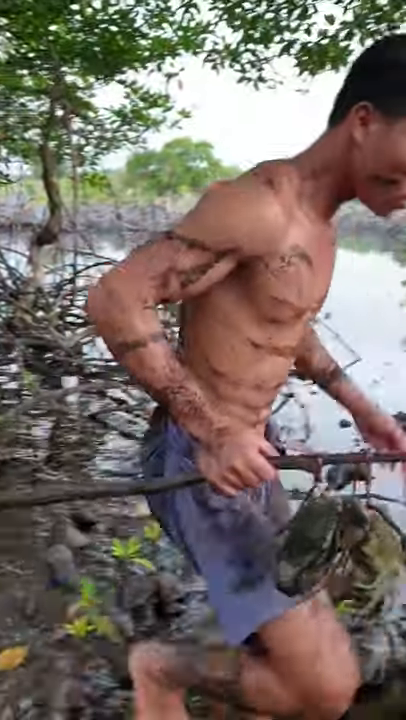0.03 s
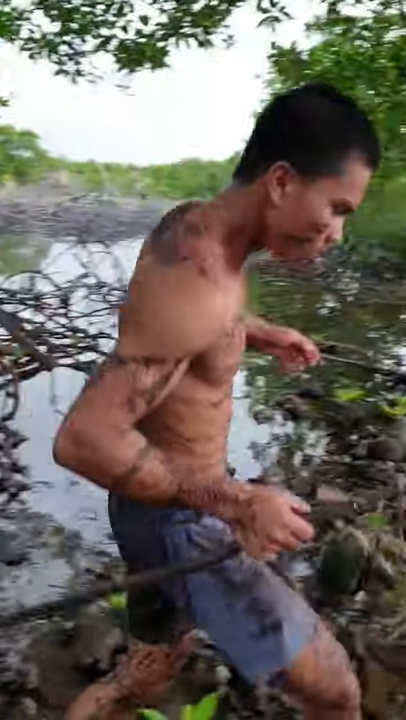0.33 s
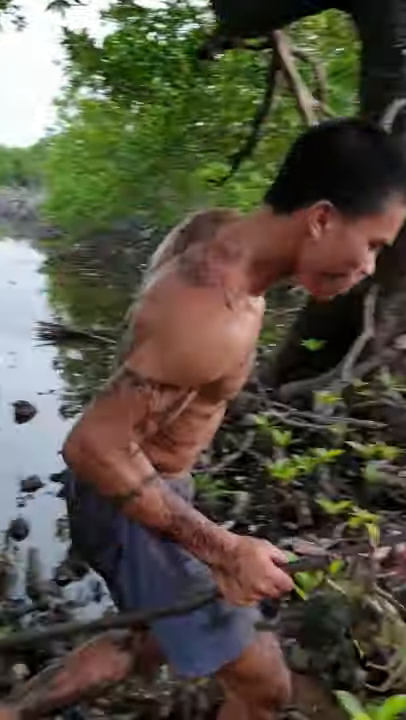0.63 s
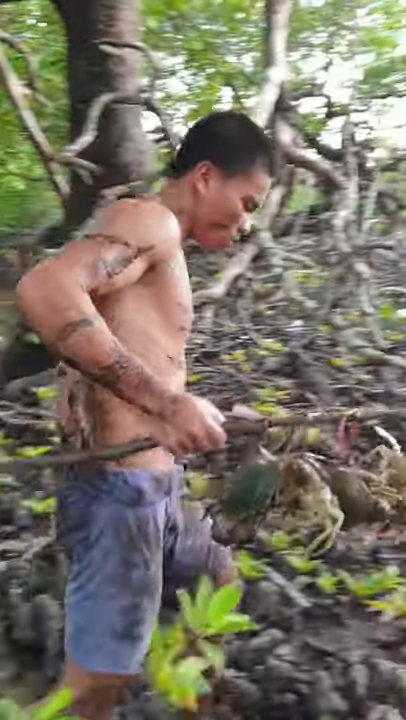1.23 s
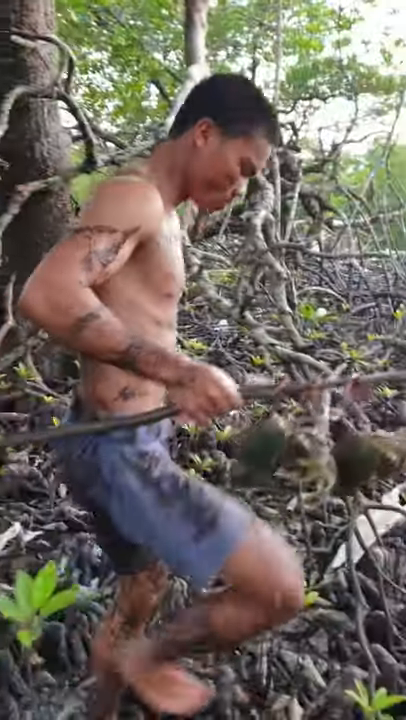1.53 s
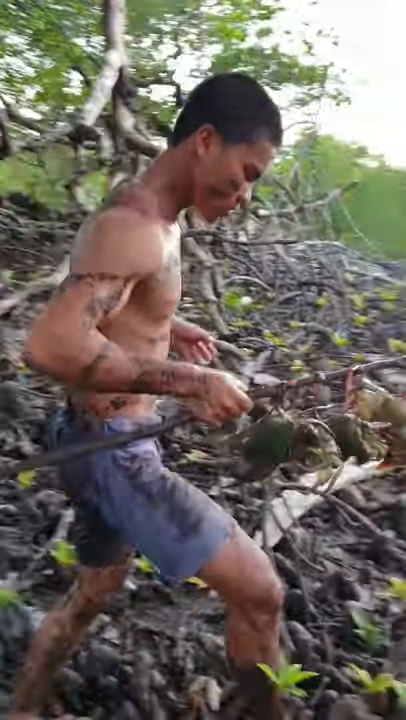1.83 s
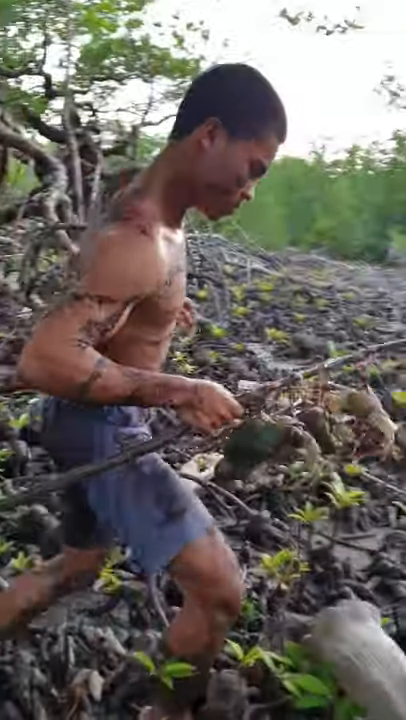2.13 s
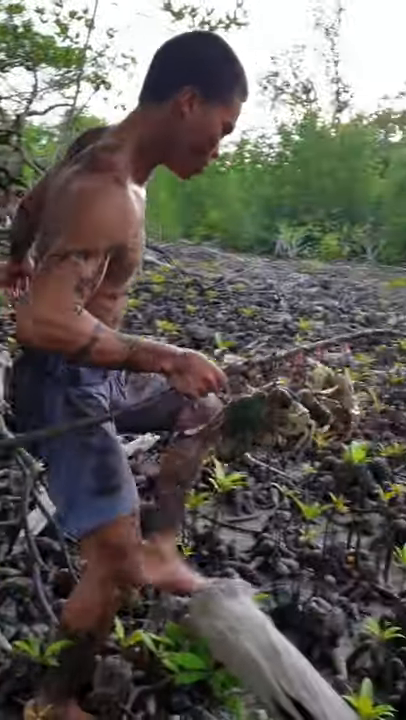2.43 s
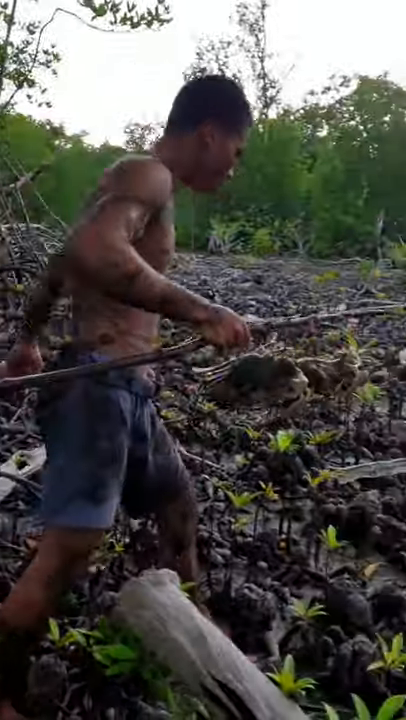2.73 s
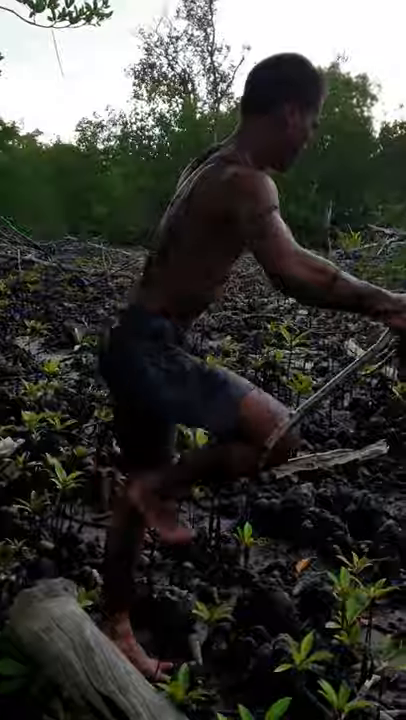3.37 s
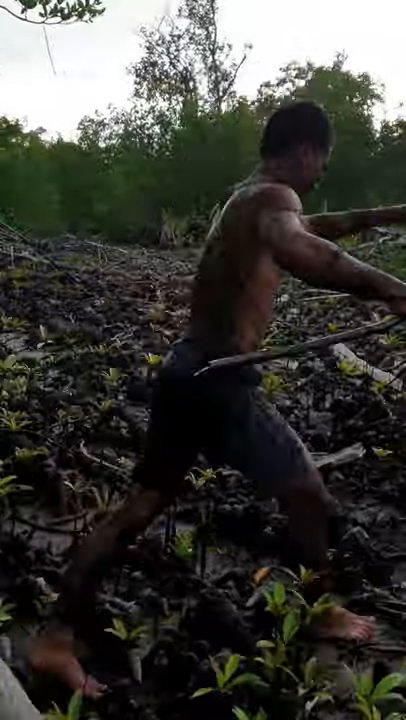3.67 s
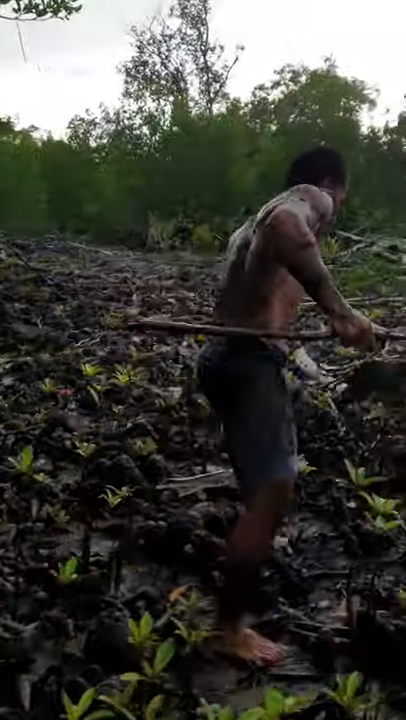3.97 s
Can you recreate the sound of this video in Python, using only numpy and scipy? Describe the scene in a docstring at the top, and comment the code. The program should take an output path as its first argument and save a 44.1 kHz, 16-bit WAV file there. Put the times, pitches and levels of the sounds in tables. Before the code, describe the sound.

Wet footsteps squelch close by as someone strides barefoot over a muddy mangrove flat. The mud gurgles and crackles, bubbles pop and twigs snap, with a few soft thuds later. Low air rumble and handling clicks touch the microphone.

```python
"""Muddy mangrove flat: someone strides barefoot, close by.
Each step presses water and air out of the mud: low gurgles, crackling bubbles, fine wet spray.
Larger bubbles pop, twigs and shoots snap, feet thud; the thicket adds a short echo.
Handling clicks and rumbling air sit mostly on the left microphone; a soft low rustle starts near 2.5 s.
Behind: wet ground fizzes, three thin chirps sound far off."""
import sys
import numpy as np
from scipy import signal
from scipy.fft import rfft, irfft
from scipy.io import wavfile
from scipy.ndimage import uniform_filter1d

SR = 44100
rng = np.random.default_rng(int(sys.argv[2]) if len(sys.argv) > 2 else 0)


def put_to_file(sound):
    """Save the sound as 16-bit audio at rate SR, in the file named by the first command-line argument."""
    columns = np.atleast_2d(sound).T  # one column per channel
    safe = np.clip(columns, -1, 1)
    whole_steps = np.round(safe * 32767)
    wavfile.write(sys.argv[1], SR, whole_steps.astype(np.int16))


N = 176400

# Moving air: t/s, level/dB (all table levels are relative)
AIR_LEVEL = [(0, -47.5), (.6, -48), (.85, -50), (1.3, -48), (1.55, -49.5), (1.85, -41.5), (2.2, -50.5),
             (2.7, -47.5), (3, -53.5), (3.7, -48)]
# Air spectrum: f/Hz, gain/dB
AIR_SPECTRUM = [(20, -26), (36, -19), (52, -2.5), (75, -0.5), (110, -3.5), (230, -21.5), (400, -35),
                (2000, -83)]
# Seeping ground and leaves: t/s, level/dB
SEEP_LEVEL = [(0, -49), (1.1, -48.5), (1.7, -49.5), (2.2, -51), (2.72, -55), (4, -53)]
# Seep spectrum: f/Hz, gain/dB
SEEP_SPECTRUM = [(400, -1.5), (1800, -3), (4500, -4), (8000, 0)]
# Distant chirps: t/s
CHIRP_TIMES_S = [2.44, 2.51, 2.58]
# Thicket echo: f/Hz, T60/s
THICKET_T60 = [(200, 0.17), (8000, 0.17)]
# Body weight landing: t/s, level/dB, f/Hz
FOOT_THUDS = [(2.10, -39, 103), (3.046, -41, 148), (3.278, -38, 61)]
# Knocks: handling clicks and bumps, mostly on the left, plus the low, longer body of footfalls near 2.1 s and
# 3.04-3.13 s: t/s, level/dB, cutoff/Hz, decay/s, left minus right/dB
KNOCKS = [(0.444, -43, 780, 0.0013, 17), (.672, -32, 600, 0.0015, 17),
          (2.1042, -25.5, 3500, 0.00047, 7.5), (2.108, -46, 1150, 0.03, 11),
          (2.655, -33.5, 2460, 0.00078, 18.5), (3.043, -44, 287, 0.036, 6.5),
          (3.053, -41, 2640, 0.0027, 17), (3.07, -37.5, 3330, 0.0032, 10.5),
          (3.083, -39.5, 2740, 0.0071, 8), (3.1246, -31, 2660, 0.0062, 8),
          (3.127, -43.5, 403, 0.04, 2)]
# Twigs and shoots: t/s, level/dB, f/Hz, width/oct, decay/s, echo/dB
TWIG_SNAPS = [(.287, -37, 9500, 0.91, 0.0025, -4), (1.1818, -11, 9830, 0.08, 0.0013, -5),
              (1.178, -28, 13500, .25, .008, 0), (1.450, -25, 7340, 0.76, 0.0014, -8),
              (1.519, -32, 7000, 0.15, 0.0027, -1), (1.628, -30, 6900, 0.15, 0.0038, -11),
              (1.80, -30, 12500, 0.27, 0.0018, 5), (1.951, -22.5, 6060, 0.55, 0.0014, -0.5),
              (2.049, -28.5, 7050, 2, 0.0031, 2.5), (2.226, -34, 9900, 1.5, 0.0023, -7),
              (3.37, -37.5, 9900, 0.38, 0.0041, -5), (2.4316, -28.5, 6830, .07, 0.003, 2),
              (3.548, -25, 11000, 0.52, 0.0021, -4), (3.566, -33.5, 2430, 0.3, 0.0018, -13),
              (3.876, -37.5, 12600, 0.34, 0.022, 5.5)]
# Larger bubbles: t/s, level/dB, f/Hz, decay/s, left minus right/dB
BUBBLE_POPS = [(.102, -28, 4050, 0.0021, -8.5), (.123, -27.5, 3240, 0.00084, -11),
               (.467, -31.5, 5400, 0.0014, -4), (.486, -24, 5340, .001, 6.5),
               (0.6671, -23.5, 1153, 0.0023, 5.5), (0.742, -31, 2770, 0.0019, -5),
               (.751, -25.5, 3320, .0007, 0), (.839, -26, 6940, 0.0014, 4), (0.968, -33, 3250, 0.0034, 0.5),
               (1.029, -20.5, 3340, 0.00083, -6.5), (1.144, -26.5, 1740, 0.0016, 3),
               (1.205, -35.5, 1300, 0.0021, 5), (1.382, -23, 2320, 0.00072, 4),
               (1.422, -29.5, 906, 0.0024, 7), (1.449, -30, 2550, 0.00067, 2),
               (1.5866, -26.5, 2170, 0.0029, 0.5), (1.629, -29.5, 2580, 0.0022, 1),
               (1.711, -33.5, 2180, 0.0016, 0), (1.800, -36.5, 3470, .002, -8),
               (1.906, -34.5, 1920, 0.0029, 4.5), (1.950, -27, 2600, 0.00055, 1),
               (3.1268, -34.5, 600, 0.0046, 4)]
# Mud presses, plus one soft low rustle from about 2.5 s:
# t/s, rise/s, 20 dB fall/s (sign unused), gurgle/dB, crackle/dB, crackle f/Hz, spray/dB
PRESSES_AND_RUSTLE = [(-.05, 0.042, 0.15, -48, -53.5, 2980, -46.5),
                      (.025, 0.091, 0.17, -44, -41, 3250, -40.5), (.456, .016, 0.23, -79, -39.5, 4400, -45),
                      (0.499, 0.019, 0.3, -51.5, -50, 2370, -56.5),
                      (.622, .045, 0.1, -43.5, -42.5, 1310, -40),
                      (.70, 0.038, 0.2, -45.5, -42, 2620, -39.5), (.77, 0.02, 0.13, -61, -46, 750, -60),
                      (.88, 0.056, 0.2, -59.5, -42.5, 3020, -45),
                      (1.15, 0.035, 0.12, -55, -48.5, 2300, -37),
                      (1.272, 0.052, 0.08, -50.5, -68, 2720, -45.5),
                      (1.29, 0.11, .18, -44.5, -41.5, 3200, -34.5), (1.48, 0.044, .07, -49, -46, 2630, -49),
                      (1.55, 0.064, 0.14, -81, -44.5, 2510, -40), (1.689, 0.021, 0.1, -69, -48, 4000, -47),
                      (1.792, 0.016, 0.24, -70, -49, 3300, -44.5),
                      (1.88, 0.086, 0.15, -68, -45.5, 2140, -45.5),
                      (2.043, 0.01, .15, -67, -52.5, 2780, -39.5),
                      (2.10, 0.013, -0.03, -56, -44, 1000, -73),
                      (2.179, .13, 0.15, -68, -54.5, 2540, -50.5), (2.45, .15, 0.5, -72, -62, 420, -61),
                      (2.839, 0.048, 0.27, -61, -60.5, 2205, -55),
                      (3.04, 0.047, -0.18, -56, -49.5, 677, -50.5),
                      (3.117, 0.012, 0.13, -48, -47, 924, -43.5),
                      (3.231, 0.062, 0.15, -62.5, -53, 440, -57.5),
                      (3.372, 0.057, -0.4, -68.5, -70, 5700, -54.5),
                      (3.539, 0.011, 0.07, -69, -51, 2300, -44), (3.569, .025, 0.05, -73, -57, 4900, -42),
                      (3.70, .045, 0.12, -55, -49, 4500, -41.5), (3.85, 0.036, 0.16, -57, -54.5, 2250, -47),
                      (3.92, 0.061, -1.5, -59.5, -62, 3940, -48)]
# Gurgle spectrum: f/Hz, gain/dB
GURGLE_SPECTRUM = [(100, -22), (400, -11), (620, -2), (1100, 2.5), (2000, -0.5), (4000, -22)]
# Spray spectrum: f/Hz, gain/dB
SPRAY_SPECTRUM = [(500, -10), (2500, 1.5), (4500, 0), (12000, 0), (15000, -5)]
# Left microphone, muffled: f/Hz, gain/dB
LEFT_RESPONSE = [(60, -1.5), (3400, -1.5), (4300, -4.5), (5000, -18.5), (6400, -23), (7500, -46),
                 (8300, -25), (9500, -14.5), (11000, -13.5), (12500, -21.5), (15000, -25)]
# Right microphone, thin: f/Hz, gain/dB
RIGHT_RESPONSE = [(60, -24), (180, -24.5), (270, -7.5), (400, -4), (800, -3), (1600, -3.5), (3000, 0),
                  (5200, 0.5), (7000, 3.5), (8500, -2.5), (10200, -2.5), (12000, 3.5), (14500, -5)]


def amp(db):
    """dB to gain."""
    return 10 ** (np.asarray(db) / 20)


def unit_rms(x):
    """Scale to rms 1."""
    return x / np.sqrt(np.mean(x ** 2) + 1e-20)


def at_hz(table, hz):
    """Table lookup over log frequency."""
    f, value = np.transpose(table)
    return np.interp(np.log(hz + 1), np.log(f), value)


def envelope(table):
    """Level curve to gain per sample."""
    return amp(np.interp(np.arange(N) / SR, *np.transpose(table)))


def add(mix, start_s, sound):
    """Mix in a stereo sound."""
    part = mix[:, max(round(start_s * SR), 0):][:, :sound.shape[1]]
    part += sound[:, :part.shape[1]]


def panned(sound, pan_db, lag_s=.00022, centre_db=6):
    """Pan by level and delay; at centre_db both sides arrive together."""
    lag = round(lag_s * SR * np.clip(1 - pan_db / centre_db, -1, 1.2))
    left, right = max(lag, 0), max(-lag, 0)
    return np.array([np.pad(sound, (left, right)) * amp(pan_db / 2),
                     np.pad(sound, (right, left)) * amp(-pan_db / 2)])


def min_phase(shape_db, size=4096):
    """Minimum-phase impulse response of a gain curve."""
    hz = abs(np.fft.fftfreq(size, 1 / SR))
    log_gain = np.log(amp(np.maximum(shape_db(hz), -100)))
    return np.fft.ifft(np.exp(np.conj(signal.hilbert(log_gain)))).real[:size // 2]


def filtered(x, spectrum):
    """Apply a spectrum table."""
    response = min_phase(lambda hz: at_hz(spectrum, hz))
    return signal.oaconvolve(np.atleast_2d(x), response[None], axes=1)[:, :N]


def resonance(hz, width_oct):
    """One peak, as dB against frequency."""
    return lambda f: -20 * np.log10(1 + (np.log2((f + 1) / hz) / width_oct) ** 2 / 2)


def click(shape_db, decay_s, size=6000):
    """Filtered impulse with a splintering noise tail."""
    t = np.arange(size) / SR
    drive = rng.standard_normal(size) * np.exp(-t / decay_s) + 4 * (t == 0)
    sound = signal.fftconvolve(drive, min_phase(shape_db))[:size]
    return sound * np.sqrt(decay_s * SR / 4 / np.sum(sound ** 2))


def bubbles(low_hz, high_hz, cycles, spread_db, glide, hiss, count, size, lag_s=.00022, length=N):
    """Tiny rising rings of random pitch, strength and place, over hiss; level held steady."""
    when, pitch, strength, ring, side, lag = rng.random((count, 6)).T[:, :, None]
    n = np.arange(size)
    hz = low_hz * (high_hz / low_hz) ** pitch
    life_cycles = cycles * 2 ** (2 * ring - 1)
    age = hz * n / SR / life_cycles
    turns = life_cycles * age * (1 + glide * np.minimum(age, 2))
    rings = np.exp(-age) * (1 - np.exp(-2 * age * life_cycles)) * np.sin(2 * np.pi * turns)
    level_db = spread_db * np.minimum(-np.log(strength + 1e-9), 4)
    rings *= amp(level_db) * np.sqrt(hz / life_cycles) * (1 - n / size)
    out = np.zeros((2, length))
    for channel, sign in enumerate((-1, 1)):
        onset = (when * length - sign * lag * lag_s * SR).astype(int)
        pan = amp(sign * 10.1 * (side - .5))
        out[channel] = np.bincount(((onset + n) % length).ravel(), (rings * pan).ravel(), length)
    out = unit_rms(out) + hiss * rng.standard_normal((2, length))
    return out / np.sqrt(uniform_filter1d((out ** 2).mean(0), size=2400) + 1e-9)


def spits(rate_hz=24, decay_s=.008, depth=1.2):
    """Gain of a fizz that comes in sudden, short spits."""
    kicks = (rng.random(N) < rate_hz / SR) * np.minimum(rng.exponential(1, N), 2)
    return unit_rms(1 + depth * signal.lfilter([1], [1, -np.exp(-1 / (decay_s * SR))], kicks))


def air(correlation=.89):
    """Moving air: low rumble, alike on both sides."""
    left, other = rng.standard_normal((2, N))
    right = correlation * left + np.sqrt(1 - correlation ** 2) * other
    gain = amp(at_hz(AIR_SPECTRUM, np.fft.rfftfreq(N, 1 / SR)))
    return envelope(AIR_LEVEL) * unit_rms(irfft(rfft([left, right]) * gain, N))


def seep():
    """Wet ground: faint fizz of fine bubbles."""
    fizz = bubbles(4000, 14400, cycles=1, spread_db=6, glide=.011, hiss=1.96, count=6000, size=70)
    return envelope(SEEP_LEVEL) * unit_rms(filtered(fizz * spits(), SEEP_SPECTRUM))


def chirps(top_hz=13900, length_s=.055, level_db=-53, bend=.07):
    """Far whistles, arching up and down in pitch."""
    out, t = np.zeros((2, N)), np.arange(0, length_s, 1 / SR)
    arch = np.sin(np.pi * t / length_s)
    hz = top_hz * (1 - bend * (1 - arch))
    whistle = amp(level_db) * arch * np.sin(2 * np.pi * np.cumsum(hz) / SR)
    for start_s in CHIRP_TIMES_S:
        add(out, start_s, np.tile(whistle, (2, 1)))
    return out


def thicket(x, gap_s=.004, density=.15, size=20000):
    """Roots and trunks scatter a short, diffuse echo."""
    taps = rng.standard_normal((2, size)) * (rng.random((2, size)) < density)
    taps *= np.arange(size) / SR > gap_s
    hz, t, bands = signal.stft(taps, SR, nperseg=256)
    decay = amp(-60 * t / at_hz(THICKET_T60, hz)[:, None])
    tail = signal.istft(bands * decay, SR, nperseg=256)[1]
    return signal.fftconvolve(x, tail / np.linalg.norm(tail, axis=1, keepdims=True), axes=1)[:, :N]


def knocking(low_cut_hz=150):
    """Knocks: blunt handling clicks and bumps, mostly on the left microphone, and the low, dull body of some
    footfalls."""
    out = np.zeros((2, N))
    for start_s, db, cutoff_hz, decay_s, pan_db in KNOCKS:
        def band_db(f):
            return -10 * np.log10((1 + (f / cutoff_hz) ** 6) * (1 + (low_cut_hz / (f + 1)) ** 2))
        add(out, start_s, panned(amp(db) * click(band_db, decay_s), pan_db))
    return out


def thuds(rise_s=.011):
    """Soft ground gives a few low cycles under a landing foot."""
    out, t = np.zeros((2, N)), np.arange(SR // 5) / SR
    pulse = t / rise_s * np.exp(1 - t / rise_s)
    for start_s, db, hz in FOOT_THUDS:
        add(out, start_s, panned(amp(db) * pulse * np.sin(2 * np.pi * hz * t), pan_db=1.5))
    return out


def snaps():
    """Twigs and shoots break: bright resonant cracks, each with its own echo share."""
    direct, send = np.zeros((2, N)), np.zeros((2, N))
    for start_s, db, hz, width_oct, decay_s, echo_db in TWIG_SNAPS:
        crack = panned(amp(db) * click(resonance(hz, width_oct), decay_s), pan_db=0)
        add(direct, start_s, crack)
        add(send, start_s, crack * amp(echo_db))
    return direct + thicket(send)


def pops(glide=.058, attack_s=.00024):
    """Larger bubbles open and ring briefly, rising in pitch."""
    out, t = np.zeros((2, N)), np.arange(1500) / SR
    for start_s, db, hz, decay_s, pan_db in BUBBLE_POPS:
        turns = np.cumsum(hz * (1 + glide * np.minimum(t / decay_s, 4))) / SR
        pulse = (1 - np.exp(-t / attack_s)) * np.exp(-t / decay_s)
        add(out, start_s, panned(amp(db) * pulse * np.sin(2 * np.pi * turns), pan_db))
    return out


def lurches(depth_db=2, step_s=.02):
    """Random gain: mud yields unevenly."""
    steps = rng.standard_normal(1000)
    return amp(depth_db * np.interp(np.arange(N) / SR / step_s, np.arange(len(steps)), steps))


def crackle(hz, pitch_ratio=1.61, width_oct=.89):
    """0.5 s of bubbles near the pitch of one mud pocket."""
    stream = bubbles(hz / pitch_ratio, hz * pitch_ratio, cycles=2.54, spread_db=4, glide=.058,
                     hiss=.79, count=260, size=260, length=SR // 2)
    pocket = min_phase(resonance(hz, width_oct))
    return unit_rms(signal.oaconvolve(stream, pocket[None], axes=1)[:, :SR // 2])


def squelches(swell_db=14):
    """Pressed mud gives swells of gurgle, crackle and spray; one soft low swell is a rustle."""
    t, out = np.arange(N) / SR, np.zeros((2, N))
    gurgle_power, spray_power = np.zeros((2, N))
    for start_s, rise_s, fall_s, gurgle_db, crackle_db, hz, spray_db in PRESSES_AND_RUSTLE:
        past_peak_s = t - start_s - rise_s
        swell = amp(np.minimum(swell_db * past_peak_s / rise_s, -20 * past_peak_s / abs(fall_s)))
        swell *= np.clip(2 * (t - start_s) / rise_s + 1, 0, 1)  # fade-in before start_s
        gurgle_power += (amp(gurgle_db) * swell) ** 2
        spray_power += (amp(spray_db) * swell) ** 2
        onset_s = max(start_s - rise_s / 2, 0)
        gate = swell[round(onset_s * SR):][:SR // 2]
        add(out, onset_s, amp(crackle_db) * gate * crackle(hz)[:, :len(gate)])
    gurgle = bubbles(344, 1636, cycles=3.9, spread_db=2.5, glide=.033, hiss=.34, count=1500, size=900,
                     lag_s=.000094)
    spray = bubbles(4400, 14400, cycles=.88, spread_db=3, glide=.03, hiss=.89, count=12000, size=90)
    yielding = lurches()
    out += np.sqrt(gurgle_power) * unit_rms(filtered(gurgle, GURGLE_SPECTRUM))
    out += np.sqrt(spray_power) * unit_rms(filtered(spray * spits(), SPRAY_SPECTRUM))
    return yielding * out


def scene():
    """Steps, knocks and echo over the background."""
    mud = amp(-1.5) * squelches() + amp(2) * pops()
    knocks = knocking()
    echo = thicket(amp(-7.5) * mud + amp(-8) * knocks)
    return mud + knocks + echo + snaps() + thuds() + chirps() + air() + seep()


def record(dry):
    """Two unlike microphones, then a low-pass."""
    heard = np.vstack([filtered(dry[0], LEFT_RESPONSE), filtered(dry[1], RIGHT_RESPONSE)])
    low_pass = signal.firwin(301, cutoff=14700, window=("kaiser", 9), fs=SR)
    return signal.oaconvolve(heard, low_pass[None], "same")


dry = scene()
out = record(dry)
put_to_file(out)
```